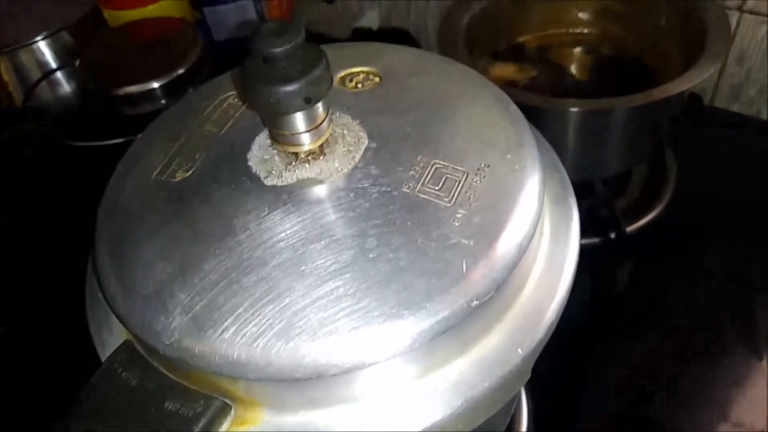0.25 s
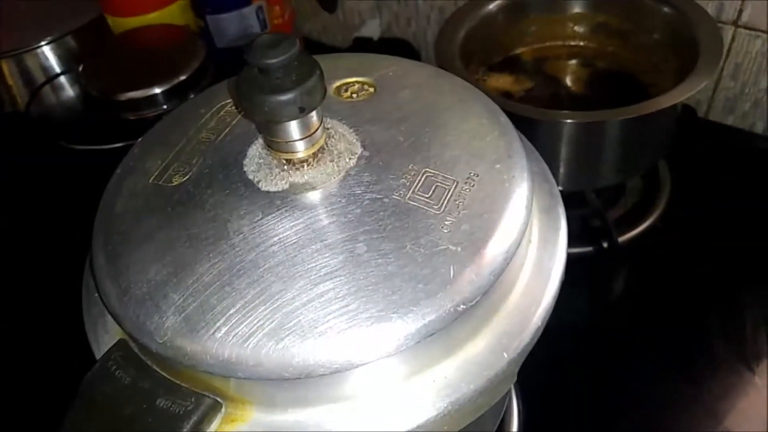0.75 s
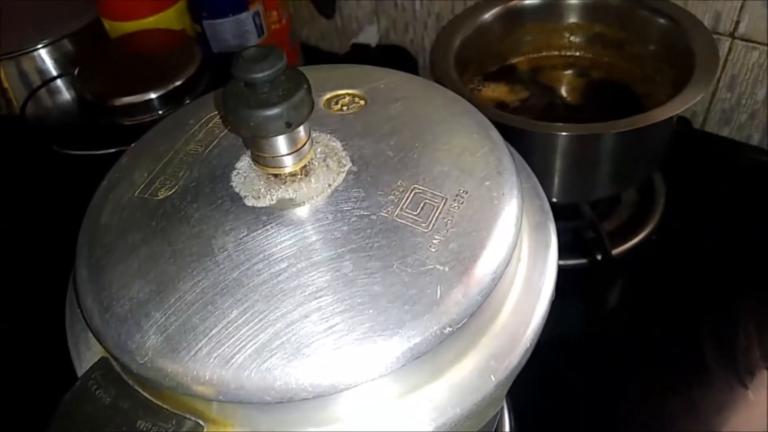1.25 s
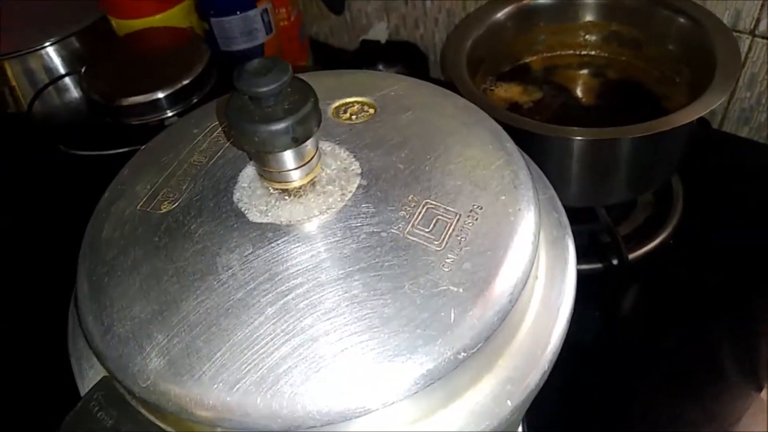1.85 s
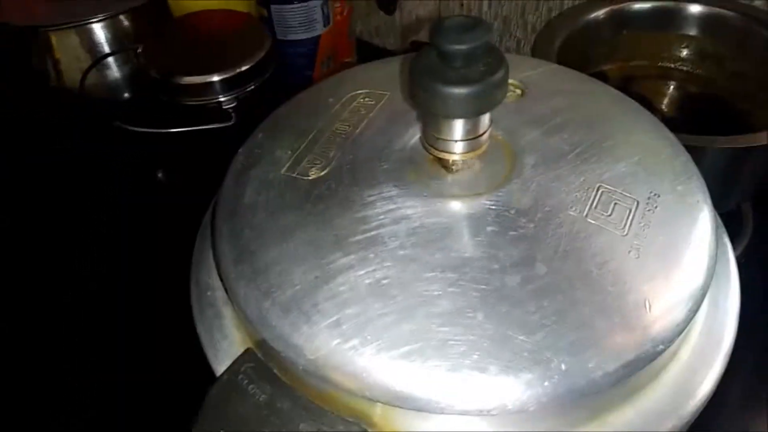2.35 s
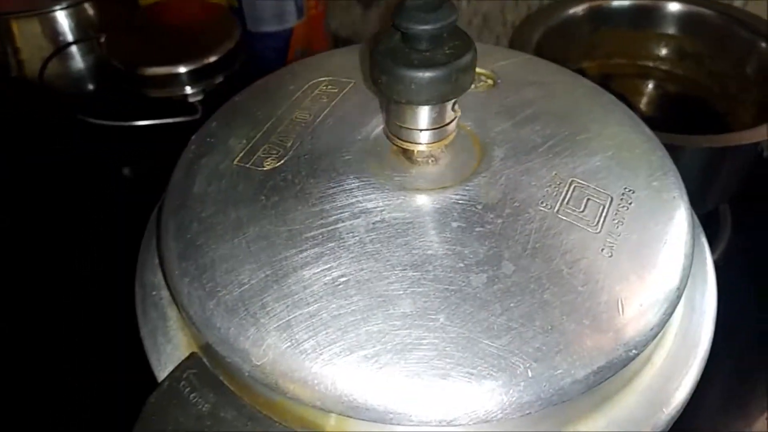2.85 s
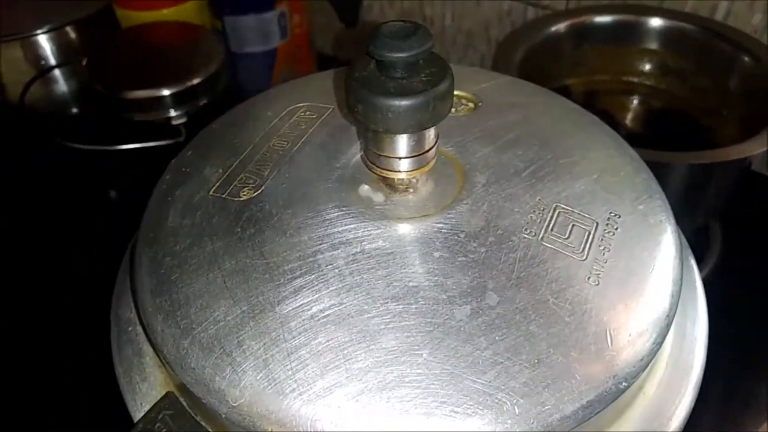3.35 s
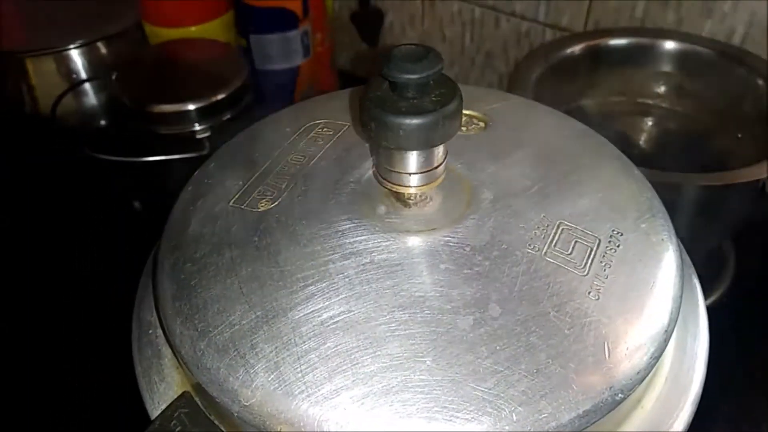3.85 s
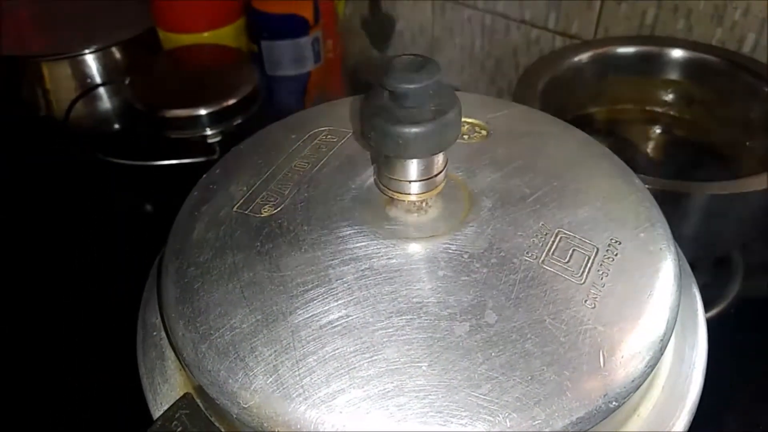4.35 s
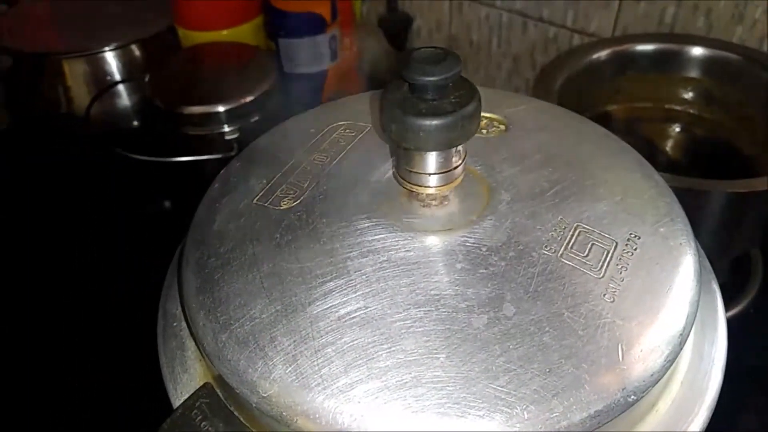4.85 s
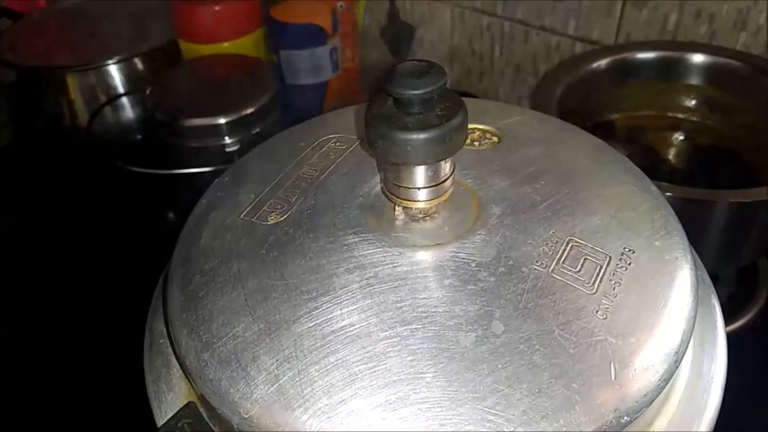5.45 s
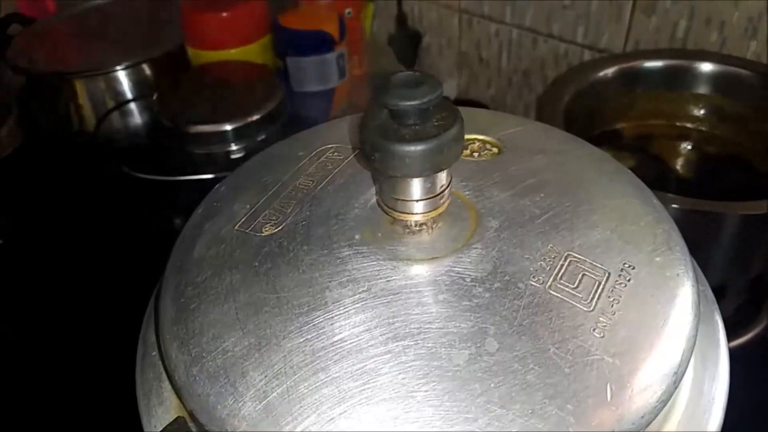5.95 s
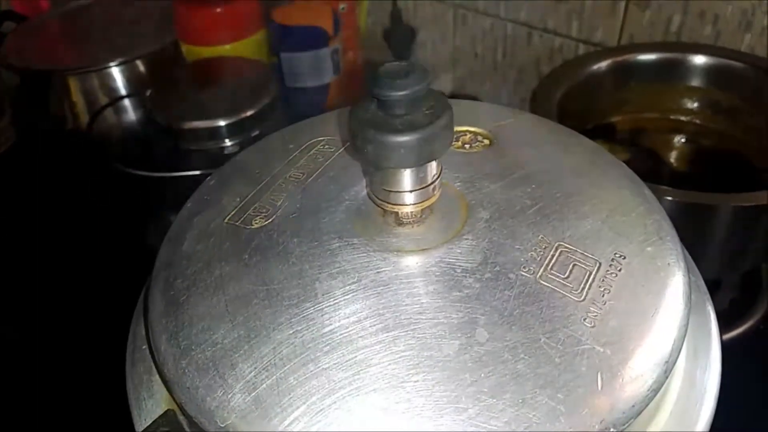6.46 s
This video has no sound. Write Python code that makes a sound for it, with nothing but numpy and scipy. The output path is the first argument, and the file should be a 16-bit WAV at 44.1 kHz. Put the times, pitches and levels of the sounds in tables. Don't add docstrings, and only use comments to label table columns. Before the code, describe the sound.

A pressure cooker seeps and faintly whistles over soft boiling knocks, then its weight lifts into a loud bright steam jet that sputters in rapid puffs.

```python
import sys
import numpy as np
from scipy import signal
from scipy.io import wavfile
from scipy.ndimage import uniform_filter1d

SR = 44100
rng = np.random.default_rng(int(sys.argv[2]) if len(sys.argv) > 2 else 0)


def pcm_store(signal):
    levels = np.round(np.clip(np.atleast_2d(signal), -1, 1) * 32767)
    wavfile.write(sys.argv[1], SR, levels.astype(np.int16).T)


def gain_from_decibels(decibels):
    exponent = np.asarray(decibels, float) / 20
    return 10 ** exponent


N = 295847

# freq_hz, likeness
PORT_LIKENESS = [(60, .85), (300, .85), (700, .65), (1300, .55), (2500, .6), (5000, .7), (7000, .5),
                 (11000, .65), (14000, .55)]
# freq_hz, level_db_per_hz
HUM_COLOUR = [(15, -52), (25, -82), (64, 2), (109, -9.5), (156, -2), (210, -1.5), (223, -22.5), (244, -6.5),
              (288, -10.5), (320, -3.5), (355, -16), (425, -10), (591, -25), (719, -16.5), (900, -19.5),
              (1170, -46), (1980, -120)]
# freq_hz, level_db_per_hz
AIR_COLOUR = [(350, -57), (600, -29), (717, -23), (2950, -18), (3300, -18), (3580, -22), (3990, -15),
              (5630, -11), (9620, -1), (12000, -22), (16000, -18)]
HUM_DB, AIR_DB = -67, -52.5

# time_s, level_db
SEEP_LEVEL = [(0, -57), (.5, -59), (.75, -61), (1.11, -54), (1.13, -66), (1.26, -59), (1.47, -55),
              (1.69, -56), (1.93, -55), (2.26, -55.5)]
# freq_hz, level_db_per_hz
SEEP_COLOUR = [(2650, -22.5), (4500, -16.5), (5280, -16.5), (5620, -15), (6060, -9), (9570, -2.5),
               (10000, -2), (11900, -23), (13000, -23.5)]
# freq_hz, left_minus_right_db
SEEP_SIDE = [(60, 11), (130, 7), (290, 6), (640, -4), (1410, 5), (3100, 4.5), (6820, -7), (15000, -11.5)]
# start_s, length_s, gain_db
BURSTS = [
    (0.058, 0.1, 4.5),
    (0.182, .07, 3.5),
    (0.294, 0.13, 6.5),
    (0.446, 0.086, 5),
    (0.572, 0.087, 8.5),
    (0.712, .1, 10),
    (0.833, 0.11, 5),
    (1.002, 0.2, 3),
    (1.934, 0.025, -13),
]
BURST_RISE_S, BURST_FALL_S, BURST_SAG = 0.0061, 0.018, 0.61

# time_s, stove_top_db, pot_db
KNOCKS = [(0.306, -62, -57), (0.761, -58, -79), (1.118, -75, -62), (1.32, -76, -62), (1.574, -63, -40),
          (1.79, -59, -58), (1.937, -56, -66), (2.134, -48.5, -55), (2.25, -56, -48), (2.753, -60, -62.5),
          (2.857, -54, -64), (2.927, -55.5, -55.5), (3.056, -59.5, -63), (3.132, -54.5, -61),
          (3.227, -60, -56), (3.438, -74, -54), (3.558, -55, -55.5), (3.656, -55, -62),
          (3.892, -55.5, -56.5), (4.178, -55, -49), (4.299, -51, -53.5), (4.469, -64, -58),
          (4.767, -55.5, -57), (4.854, -46.5, -53), (4.969, -50.5, -60.5), (5.118, -53, -59.5),
          (5.206, -48.5, -66), (5.665, -53.5, -50), (6.264, -70, -61.5), (6.453, -67, -53)]
# freq_hz, level_db, t60_s
STOVE_MODES = [(77.9, 1, 0.19), (60, -3, 0.17)]
# freq_hz, level_db, t60_s
POT_MODES = [(157.7, -1, 0.27), (199.2, -2, 0.22), (289, -8.5, 0.18), (401, -12, 0.12), (578, -23, 0.074)]

# start_s, length_s, freq_hz, width_hz, level_db
FRONT_WHEEZES = [
    (0.327, 0.15, 3260, 2400, -60),
    (1.102, 0.25, 4180, 1330, -61),
    (1.487, 0.045, 560, 460, -64.5),
    (1.553, 0.089, 510, 280.6, -63.5),
    (1.62, 0.5, 3840, 400, -65),
]
# start_s, length_s, freq_hz, width_hz, level_db
LEFT_WHEEZES = [
    (1.354, 0.15, 4170, 2340, -58.5),
    (1.49, 0.27, 4000, 2160, -59),
    (1.79, 0.48, 3950, 500, -68),
]
# start_s, length_s, pitch_hz, level_db
HIGH_SPELLS = [
    (1.07, 0.48, 3570, -64.5),
    (1.36, 0.29, 3600, -68),
    (1.53, 0.24, 3480, -62),
    (1.76, 0.41, 3450, -62.5),
]
# start_s, length_s, pitch_hz, level_db
LOW_SPELLS = [
    (1.34, 0.3, 1296, -64),
    (1.49, 0.17, 1340, -71),
    (1.6, 0.23, 1296, -62.5),
    (1.8, 0.14, 1290, -70),
]
SPELL_RISE_S, SPELL_FALL_S, SPELL_SAG_HZ_PER_S = 0.031, 0.082, 100

LIFT_S = 2.277
# freq_hz, width_hz, left_db, right_db, t60_s
SPURT = [(7160, 1460, -60, -33, 0.4), (13600, 3000, -82, -32.5, 0.31), (3130, 2500, -49, -52, 0.6),
         (900, 1700, -52.5, -53.5, 0.086)]
# freq_hz, level_db_per_hz
JET_COLOUR = [(290, -34), (500, -24.5), (569, -29.5), (1410, -15), (1750, -9), (3260, -9.5), (3610, -13),
              (3990, -10.5), (4480, -9), (6060, -12), (6900, -11), (8820, -5.5), (10900, -2), (11600, -5),
              (15700, -17)]
# freq_hz, left_minus_right_db
JET_SIDE = [(60, 15), (110, 2), (200, 6), (380, 1.5), (700, -3), (1290, 3), (2380, 2.5), (4400, 0),
            (8120, 2.5), (15000, -6.5)]
# time_s, level_db
FLOW = [(2.36, -51), (2.73, -50), (3.06, -48.5), (3.22, -44), (3.4, -43), (3.85, -42), (4.08, -46),
        (4.45, -46), (4.9, -45.5), (5.2, -44), (5.5, -46.5), (6.0, -44), (6.7, -47.5)]
# over_flow_db, left_minus_right_db
HIGH_REST = (2.8, -8.5)
# over_flow_db, left_minus_right_db
LOW_REST = (-3, -1.6)
ROAR_REST_DB = -12
# start_s, length_s, freq_hz, level_db, left_minus_right_db
TONGUES = [(3.083, .25, 2950, -58.5, 2), (3.307, 0.51, 2540, -49.5, 1.5), (3.352, 0.256, 8680, -31.5, -35),
           (3.353, 0.13, 6020, -41.5, -15), (3.576, 0.177, 8830, -31, -26),
           (3.678, 0.059, 5260, -41.5, -16), (3.758, 0.16, 5600, -39, -3), (3.767, 0.068, 8640, -39.5, -18),
           (3.866, .18, 8600, -32.5, -28), (3.87, 0.15, 6100, -40.5, -2.5), (4.16, .07, 6600, -46, -9),
           (4.2, 0.23, 1450, -61.5, 1), (4.262, 0.086, 8780, -35, -24), (4.258, .08, 6560, -46, -14),
           (4.78, 0.069, 8600, -42, -12), (4.832, 0.1, 6350, -46, 5), (5.017, 0.16, 6940, -44, 17)]
TONGUE_RISE_S, TONGUE_FALL_S, TONGUE_WIDTH_HZ, TONGUE_SAG_DB_PER_S = 0.0079, 0.037, 1880, 13
# peak_s, lift_db, high_db, low_db, low_left_minus_right_db
PUFFS = [(5.32, 2.5, 1.5, 3.5, 3), (5.43, 3, 2.5, 8, 9), (5.567, 4, 0.5, 10.5, -2), (5.7, 4.5, 0, 8.5, 6),
         (5.868, 3.5, 0, 7.5, -5), (5.994, 6.5, 2, 10.5, -2), (6.155, 8, 7, 10.5, -6.5),
         (6.316, 7, 8.5, 12.5, 1), (6.442, 6.5, -0.5, 1, 1), (6.55, 4.5, 0, 0.5, 2),
         (6.608, 9.5, 7, 9.5, -8), (6.71, 5, 5.5, 3, 0)]
PUFF_HALF_S = 0.085
PUFF_AIM_DB_PER_DB, PUFF_ROAR_DB_PER_DB = -0.35, .5
# time_s, lag_samples
LAG = [(2.27, 16), (2.28, 12), (4.3, 13), (4.6, 8)]
# freq_hz, width_hz, left_db, right_db
HOLLOWS = [(1800, 250, -6, -6), (2500, 150, -4, -4), (3640, 260, -11, -11), (4420, 220, -7, -7),
           (5450, 260, -6, -6), (8350, 300, -7, -1), (11400, 350, -5, -6), (12350, 300, -6, -6),
           (13250, 300, -5, -5)]
# freq_hz, width_hz, depth_db, until_s
EARLY_HOLLOW = (5250, 1000, -9, 3.22)
STREAK_DB, STREAK_FROM = -16, .6
EDGE_HZ = 15800


def evened(x):
    return x / np.sqrt(np.mean(x ** 2) + 1e-20)


def read(points, hz):
    f, value = np.transpose(points)
    return np.interp(np.log(hz + 1), np.log(f + 1), value)


def band(hz, centre_hz, width_hz, order=4):
    return np.exp(-np.log(2) * abs(2 * (hz - centre_hz) / width_hz) ** order)


def power_db(db, hz, lo, hi):
    return 10 * np.log10(np.sum(gain_from_decibels(2 * db[(hz > lo) & (hz < hi)])) * hz[1])


def split(mid_db, pan_db):
    return np.array([mid_db - 10 * np.log10((1 + gain_from_decibels(-2 * s * pan_db)) / 4) for s in (1, -1)])


def spell(t, start, length, rise, fall):
    return np.clip((t - start) / rise, 0, 1) * np.clip((start + length - t) / fall, 0, 1)


def smooth(x, time_size, hz_size):
    return uniform_filter1d(uniform_filter1d(x, size=time_size, axis=-1), size=hz_size, axis=-2)


def flutter(count):
    return evened(uniform_filter1d(uniform_filter1d(rng.standard_normal(N), count), count))


def grid(size, until=N / SR):
    frames = int(4 * until * SR / size) + 5
    return np.fft.rfftfreq(size, 1 / SR), np.arange(frames) * size / 4 / SR


def noise(db, size, lag):
    hz, t = grid(size)
    a, b, c, d = rng.standard_normal((db.shape[2], len(hz), 4), dtype=np.float32).T
    same = np.clip(read(PORT_LIKENESS, hz), 0, 1)[:, None]
    late = np.exp(-2j * np.pi * hz[:, None] * lag / SR)
    right = a + 1j * b
    left = same * late * right + np.sqrt(1 - same ** 2) * (c + 1j * d)
    z = np.array([left, right]) * gain_from_decibels(db) * np.sqrt(1.5 * SR / size)
    x = signal.istft(z, nperseg=size, noverlap=3 * size // 4)[1][:, :N]
    return np.pad(x, ((0, 0), (0, N - x.shape[1])))


def kitchen():
    hz, t = grid(2048)
    low_db = read(HUM_COLOUR, hz)
    low_db = low_db - power_db(low_db, hz, 25, 940) + HUM_DB - 1.0
    high_db = read(AIR_COLOUR, hz)
    high_db = high_db - power_db(high_db, hz, 600, 16000) + AIR_DB
    high_db -= 8 * band(hz, 8800, 4600)
    drone_db = -71 - 14 * t + 10 * np.log10(band(hz, 337, 27, order=2) / 40 + 1e-20)[:, None]
    lumps_db = 4.06 * np.minimum(flutter(count=1200), 1.6)[np.minimum(t * SR, N - 1).astype(int)]
    power = gain_from_decibels(2 * (low_db[:, None] + lumps_db)) + gain_from_decibels(2 * high_db)[:, None] + gain_from_decibels(2 * drone_db)
    return noise(10 * np.log10([power, power]), 2048, lag=4)


def seep_db(hz, t):
    rest_db = read(SEEP_COLOUR, hz)[:, None]
    leak_db = np.interp(t, *np.transpose(SEEP_LEVEL))
    for s, length, gain_db in BURSTS:
        sag = 1 - BURST_SAG * (t - s) / length
        leak_db = leak_db + gain_db * spell(t, s, length, BURST_RISE_S, BURST_FALL_S) * sag
    mid_db = rest_db - power_db(rest_db, hz, 6000, 10500) + leak_db
    return split(mid_db, read(SEEP_SIDE, hz)[:, None])


def knocks():
    out, t = np.zeros((2, N + SR)), np.arange(SR // 3) / SR
    chance = rng.random((len(KNOCKS), 15))
    for (s, stove_db, pot_db), draw in zip(KNOCKS, chance):
        modes = [(f, db + stove_db + 5.5, t60) for f, db, t60 in STOVE_MODES]
        modes += [(f, db + pot_db + 4.5, t60) for f, db, t60 in POT_MODES]
        skew = np.array([[.07], [-.07]]) * (draw[13] - .3)
        ring = 0
        for k, (f, db, t60) in enumerate(modes):
            cycles = f * (.94 + 0.162 * draw[k]) * t
            ring = ring + gain_from_decibels(db - 60 * t / t60) * np.sin(2 * np.pi * (cycles + draw[k + 7] + skew))
        at, lean_db = round(s * SR), 3. * (draw[14] - .5)
        out[:, at:at + len(t)] += gain_from_decibels([[lean_db], [-lean_db]]) * ring * (1 - np.exp(-t / 0.0084))
    return out[:, :N]


def gasket():
    hz, t = grid(1024, until=2.3)
    power = np.zeros((2, len(hz), len(t))) + 1e-20
    for rows, width, pan_db in ((HIGH_SPELLS, 110, 3), (LOW_SPELLS, 65, 4)):
        for s, length, f, db in rows:
            shape = band(hz[:, None], f - SPELL_SAG_HZ_PER_S * (t - s), width, order=2) / width
            fade = spell(t, s, length, SPELL_RISE_S, SPELL_FALL_S) ** 2
            power += gain_from_decibels(2 * split(db, pan_db))[:, None, None] * shape * fade
    for rows, pan_db in ((LEFT_WHEEZES, 22), (FRONT_WHEEZES, 2.5)):
        for s, length, f, width, db in rows:
            shape = band(hz, f, width)[:, None] / width
            fade = np.sin(np.pi * np.clip((t - s) / length, 0, 1)) ** 1.6
            power += gain_from_decibels(2 * split(db, pan_db))[:, None, None] * shape * fade
    return noise(10 * np.log10(power), 1024, lag=15.5)


def spurt():
    hz, t = grid(256, until=3)
    after = np.maximum(t - LIFT_S, 0)
    power = 1e-20
    for f, width, left_db, right_db, t60 in SPURT:
        decay_db = np.reshape([left_db, right_db], (2, 1, 1)) - 60 * after / t60
        power = power + gain_from_decibels(2 * decay_db) * band(hz, f, width, order=8)[:, None] / width
    onset = np.clip((np.arange(N) / SR - LIFT_S) / 0.00089, 0, 1)
    return noise(10 * np.log10(power), 256, lag=13.6) * onset


def tongues_power(hz, t):
    power = 0
    for s, length, f, db, pan_db in TONGUES:
        shape = band(hz, f, TONGUE_WIDTH_HZ, order=8)[:, None] / TONGUE_WIDTH_HZ
        level = gain_from_decibels(2 * split(db - TONGUE_SAG_DB_PER_S * (t - s), pan_db))[:, None]
        power = power + level * shape * spell(t, s, length, TONGUE_RISE_S, TONGUE_FALL_S) ** 2
    return power


def jet_db(hz, t):
    peak_s, *sizes = np.transpose(PUFFS)
    puff = np.cos(np.pi / 2 * np.clip((t - peak_s[:, None]) / PUFF_HALF_S, -1, 1)) ** 2
    lift_db, high_db, low_db, low_pan_db = np.array(sizes) @ puff
    rest_db = read(JET_COLOUR, hz)[:, None]
    rest_db -= power_db(rest_db, hz, 9800, 12000)
    high = band(hz, 8600, 2100, order=8)[:, None]
    low = band(hz, 6550, 2100, order=8)[:, None]
    roar = band(hz, 2160, 2010)[:, None]
    mid_db = rest_db + np.interp(t, *np.transpose(FLOW)) + lift_db
    mid_db = mid_db + high * (HIGH_REST[0] + high_db - power_db(rest_db, hz, 7600, 9600))
    mid_db += low * (LOW_REST[0] + low_db - power_db(rest_db, hz, 5400, 7500))
    mid_db += roar * (ROAR_REST_DB + PUFF_ROAR_DB_PER_DB * low_db - power_db(rest_db, hz, 1000, 3400))
    pan_db = read(JET_SIDE, hz)[:, None] * np.clip(1 - high - low, 0, 1)
    pan_db = pan_db + high * (HIGH_REST[1] + PUFF_AIM_DB_PER_DB * high_db) + low * (LOW_REST[1] + low_pan_db)
    return 10 * np.log10(gain_from_decibels(2 * split(mid_db, pan_db)) + tongues_power(hz, t))


def hollows_db(hz, t, lifted):
    db = np.zeros((2, len(hz), len(t)))
    for f, width, left_db, right_db in HOLLOWS:
        drift = evened(uniform_filter1d(rng.standard_normal(len(t)), size=50))
        depth = np.clip(1 + .4 * drift, 0, 2) * (.15 + .85 * lifted)
        db += np.multiply.outer([left_db, right_db], band(hz[:, None], f + 15 * drift, width, order=2) * depth)
    f, width, depth_db, until_s = EARLY_HOLLOW
    return db + depth_db * band(hz, f, width)[:, None] * lifted * np.clip((until_s - t) / .12, 0, 1)


def texture_db(hz, t):
    streaks = evened(smooth(rng.standard_normal((len(hz), len(t))), time_size=24, hz_size=2))
    outside_core = ((hz > 1500) * (1 - .8 * band(hz, 8700, 5000)))[:, None]
    patches = evened(smooth(rng.standard_normal((2, len(hz), len(t))), time_size=14, hz_size=6))
    return STREAK_DB * np.clip(streaks - STREAK_FROM, 0, 1.5) * outside_core + 1.97 * patches


def near_echoes(x, echo_db=-11, t60=.022):
    t, out = np.arange(700) / SR, np.zeros_like(x)
    turn = np.pi * np.arange(N) / SR / 2.5
    for k in range(3):
        taps = rng.standard_normal((2, len(t))) * gain_from_decibels(-60 * t / t60) * (t > .0004)
        taps = signal.lfilter(*signal.butter(2, 1500, "high", fs=SR), taps)
        taps /= np.linalg.norm(taps, axis=1, keepdims=True)
        share = np.sqrt(2 / 3) * np.cos(turn + np.pi * k / 3)
        out += signal.oaconvolve(x * share, taps, axes=1)[:, :N]
    return (x + gain_from_decibels(echo_db) * out) / np.sqrt(1 + gain_from_decibels(2 * echo_db))


def valve():
    hz, t = grid(512)
    t = t - 128 / SR
    lifted = t > LIFT_S
    db = np.where(lifted, jet_db(hz, t), seep_db(hz, t))
    db += hollows_db(hz, t, lifted) + texture_db(hz, t)
    droplets = gain_from_decibels(0.33 * flutter(count=40))
    steam = noise(db, 512, lag=np.interp(t, *np.transpose(LAG))) * droplets
    return near_echoes(steam + spurt())


def scene():
    return kitchen() + valve() + knocks() + gasket()


def gate(x, below_db=-4.0, depth_db=-16, from_hz=1600):
    pair = np.array([[1, 1], [1, -1]]) / np.sqrt(2)
    hz, t, z = signal.stft(pair @ x, SR, nperseg=1024, noverlap=512)
    here_db = 10 * np.log10(smooth(abs(z) ** 2, time_size=2, hz_size=3) + 1e-20)
    around_db = smooth(here_db, time_size=3, hz_size=25)
    under = np.clip(below_db + around_db - here_db, 0, 2) / 2
    z = z * gain_from_decibels(depth_db * under * (hz > from_hz)[:, None])
    return pair @ signal.istft(z, SR, nperseg=1024, noverlap=512)[1][:, :N]


def roll_off(x):
    return signal.sosfilt(signal.butter(12, 16420, fs=SR, output="sos"), x)


def record(dry):
    lowpass = signal.firwin(601, EDGE_HZ, window=("kaiser", 9), fs=SR)
    mix = signal.oaconvolve(gate(dry), lowpass[None], "same", axes=1)
    return roll_off(mix)


dry = scene()
out = record(dry)
pcm_store(out)
```